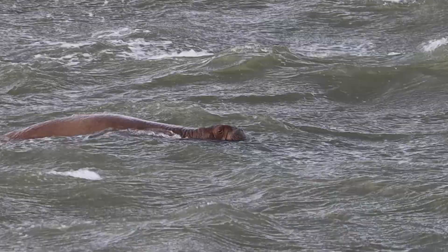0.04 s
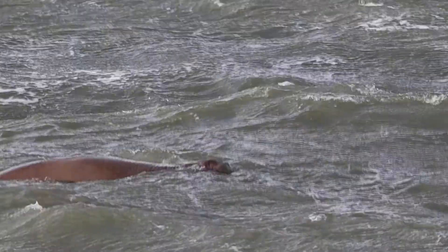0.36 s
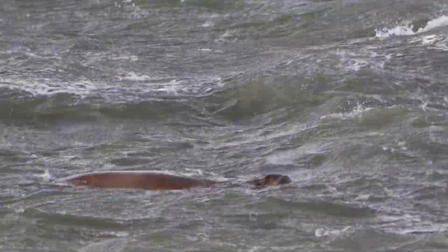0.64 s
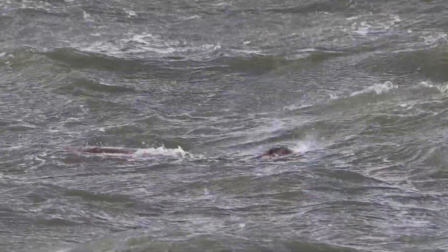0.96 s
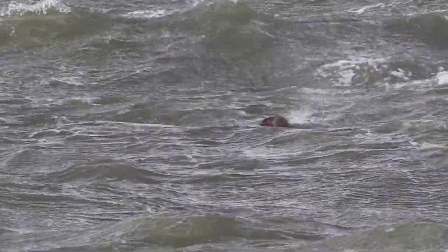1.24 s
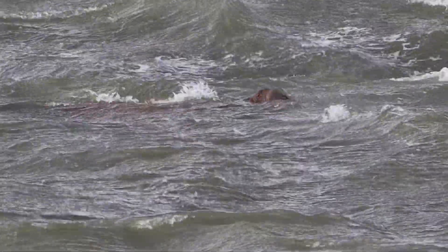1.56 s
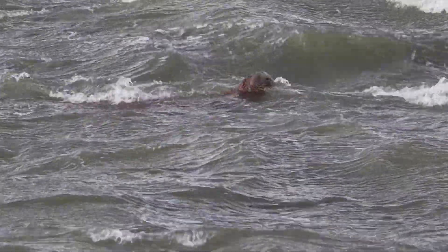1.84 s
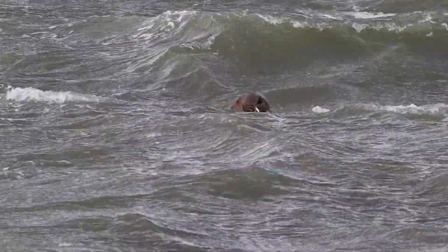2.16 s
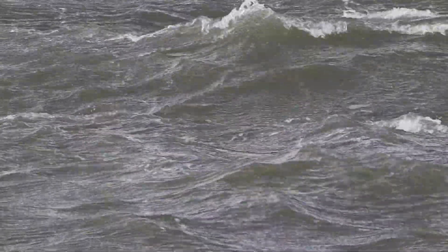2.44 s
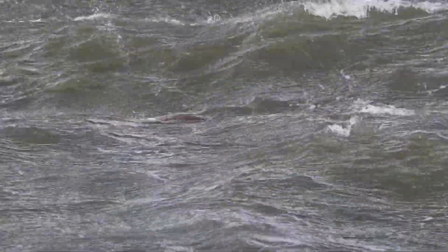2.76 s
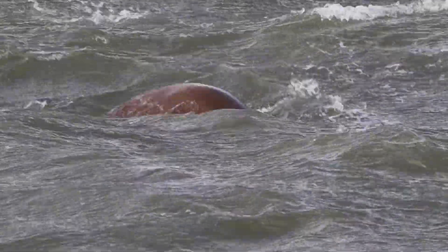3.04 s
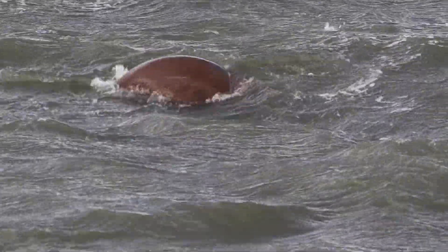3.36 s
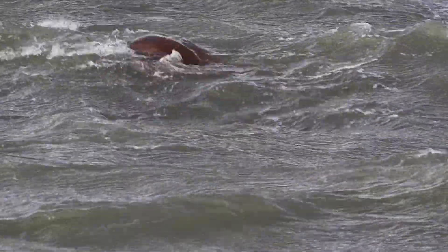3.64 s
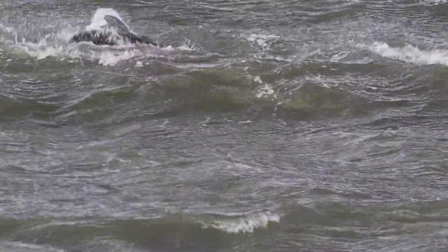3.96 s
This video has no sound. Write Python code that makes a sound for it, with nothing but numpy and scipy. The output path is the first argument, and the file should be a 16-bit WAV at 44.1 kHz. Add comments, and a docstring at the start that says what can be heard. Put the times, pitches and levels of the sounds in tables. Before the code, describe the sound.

Wind buffets the microphone from about 0.1 seconds, fluttering and crackling unevenly on both sides over a thin low rumble. Sharp little snaps cluster in the first half second, and gusts hit around 1 and 1.4 seconds. The wind turns slightly weaker and duller between 2 and 3 seconds, then rushes harder on the right near 3.2 and 3.8 seconds. Choppy sea water hisses faintly underneath throughout.

```python
"""On a shore, gusty wind buffets the two ports of a microphone, whose low cut thins each port's own wind. Small
eddies act locally, so each port has its own turbulence: it flutters, crackles and snaps, and evens into a rush
in the strongest gusts. Large eddies press on both ports together, so the bass is shared. The hiss of choppy
water lies faintly underneath."""
import sys
import numpy as np
from scipy import signal
from scipy.fft import rfft, irfft
from scipy.io import wavfile
from scipy.ndimage import uniform_filter1d

SR = 44100
rng = np.random.default_rng(int(sys.argv[2]) if len(sys.argv) > 2 else 0)


def transcribe(u):
    """Save the signal u as a 16-bit wav file named by the first command-line argument.

    u: samples, shape (n,) or (channels, n), limited to [-1, 1]; the rate is SR.
    q: integer samples, one column per channel.
    """
    v = np.clip(np.atleast_2d(u).T, -1, 1)
    q = np.round(v * 32767).astype(np.int16)
    wavfile.write(sys.argv[1], SR, q)


N = 176400
TIME_S = np.arange(N) / SR
BIN_HZ = np.arange(N // 2 + 1) * SR / N

# Gust envelope at each port: time_s, body_db, treble_db
LEFT_GUSTS = [(.12, -18, -30), (.16, -21, -30.5), (.2, -25.5, -34), (.225, -17, -26), (.28, -24, -36),
              (.38, -16.5, -26.5), (.46, -22, -28), (.54, -19, -37), (.64, -23.5, -34.5),
              (.81, -23.5, -35.5), (.87, -21, -31), (1.07, -23.5, -40), (1.11, -21, -33.5),
              (1.14, -29.5, -45), (1.23, -26.5, -48), (1.32, -22, -33.5), (1.57, -23.5, -34.5),
              (1.66, -29.5, -50), (1.72, -20.5, -31), (1.78, -25.5, -39.5), (1.98, -23, -38.5),
              (2.13, -23, -39.5), (2.19, -25.5, -40.5), (2.27, -20.5, -31.5), (2.41, -29, -51),
              (2.58, -26.5, -46.5), (2.63, -29, -58), (2.87, -27, -51), (2.88, -16.5, -51),
              (2.91, -34, -53), (2.95, -23.5, -33), (3.05, -28, -62), (3.19, -21, -39), (3.24, -30, -50),
              (3.31, -23.5, -44), (3.435, -40, -72), (3.49, -21.5, -56), (3.54, -33, -53),
              (3.61, -26.5, -46), (3.84, -21, -45), (3.86, -26.5, -54), (3.97, -25, -43), (3.99, -31, -50)]
RIGHT_GUSTS = [(0.12, -21.5, -34.5), (0.2, -22.5, -39), (0.3, -21, -43), (0.338, -23, -33),
               (0.348, -12.5, -26), (0.375, -15.5, -24), (0.47, -20.5, -32.5), (0.51, -30, -40),
               (0.53, -20, -28), (0.61, -17.5, -28), (0.63, -35, -48), (0.69, -21.5, -29.5),
               (0.71, -31, -37.5), (0.765, -22.5, -36), (0.795, -27, -36), (0.805, -20, -37),
               (0.83, -16, -22), (0.845, -21, -41), (0.86, -20, -29), (0.9, -26.5, -35), (0.93, -15, -28.5),
               (0.945, -26, -34), (0.982, -28, -45), (0.99, -14, -22.5), (1.01, -26.5, -40),
               (1.07, -28, -40), (1.11, -21, -29), (1.15, -31, -47.5), (1.26, -22.5, -32.5),
               (1.29, -21.5, -43), (1.34, -26, -36), (1.36, -18, -29), (1.408, -21, -38), (1.428, -23, -31),
               (1.438, -13.5, -27.5), (1.448, -9, -27), (1.457, -44, -42), (1.49, -18.5, -36),
               (1.53, -31, -58), (1.58, -18, -26.5), (1.62, -34, -52), (1.705, -27, -43),
               (1.72, -13, -32.5), (1.79, -32, -47), (1.81, -23, -40), (1.94, -28, -47), (1.95, -19, -41),
               (2.0, -18.5, -35.5), (2.02, -22, -44), (2.05, -21, -38), (2.15, -22, -52), (2.18, -31, -42),
               (2.2, -22.5, -39), (2.315, -27.5, -41), (2.325, -16, -34), (2.36, -24.5, -41),
               (2.45, -20.5, -52), (2.49, -17, -33.5), (2.53, -24, -50), (2.59, -19, -39.5),
               (2.64, -28, -51), (2.68, -21, -48), (2.715, -25.5, -49), (2.755, -18.5, -41.5),
               (2.85, -35, -49.5), (2.89, -24, -43), (2.93, -33, -67), (2.97, -17, -37), (3.01, -25.5, -48),
               (3.055, -33.5, -75), (3.065, -22, -56), (3.12, -15, -34.5), (3.16, -15, -26.5),
               (3.21, -16, -30.5), (3.25, -19, -33.5), (3.275, -14, -28), (3.31, -15.5, -24.5),
               (3.32, -17, -35.5), (3.35, -21, -35.5), (3.36, -25, -46), (3.38, -17.5, -31),
               (3.4, -21, -41), (3.42, -33, -65), (3.447, -42, -64), (3.458, -18.5, -38),
               (3.49, -15.5, -36.5), (3.512, -32.5, -59), (3.7, -25, -47), (3.713, -22.5, -56),
               (3.733, -12.5, -40), (3.747, -46, -52), (3.772, -11, -29), (3.785, -31, -60),
               (3.806, -26, -38.5), (3.818, -10.5, -21), (3.835, -19, -35), (3.865, -23.5, -45),
               (3.887, -16, -26), (3.895, -17, -46), (3.91, -36, -54), (3.917, -12.5, -26),
               (3.973, -14.5, -29), (3.99, -29.5, -44)]
# Turbulence spectrum at each port: frequency_hz, density_db
LEFT_SPECTRUM = [(60, -35), (130, -51), (280, -8.5), (600, 2), (800, 2), (1400, -3), (2200, -8.5),
                 (3200, -14), (5000, -27), (7500, -42.5), (10000, -53), (16000, -63)]
RIGHT_SPECTRUM = [(60, -42), (130, -40), (280, -11.5), (600, -0.5), (900, 1.5), (1600, -1), (2200, -6),
                  (3200, -12.5), (5000, -26), (7500, -41.5), (10000, -52.5), (16000, -64)]
def wind_at_ports():
    """Incoherence: small eddies give each port its own noise; only a weak, dull part crosses over."""
    ports = np.array([turbulence(LEFT_GUSTS, LEFT_SPECTRUM) + crackle(LEFT_GUSTS),
                      turbulence(RIGHT_GUSTS, RIGHT_SPECTRUM) + crackle(RIGHT_GUSTS)])
    crosstalk = signal.sosfilt(signal.butter(2, 2380, fs=SR, output="sos"), ports[::-1])
    return ports + undb(-20) * crosstalk


# Eddy scales, large to small: rate_per_s, spread_db
EDDIES = [(70, 2), (220, 4), (700, 3.5)]
# How strongly the eddies modulate each band: frequency_hz, depth_factor
EDDY_DEPTH = [(150, 0.27), (400, 0.81), (900, 1.1), (2500, 1.21), (5000, 1.93), (10000, 2.3)]
# How far each band follows the treble rather than the body: frequency_hz, weight_factor
BRIGHTENING = [(250, -0.1), (900, -0.21), (2000, 0.25), (4500, 0.78), (8000, 1.5), (16000, 1.87)]
def turbulence(gusts, spectrum, usual_treble_db=-20.5, flicker_db=3.5, gain_db=.44):
    """Amplitude modulation: gusts set level and brightness, and eddies shake the treble hardest."""
    body_db = over_time(gusts)
    bright_db = over_time(gusts, column=2) - body_db - usual_treble_db
    broken = intermittency(gusts)
    eddies_db = broken * sum(db * wander(rate) for rate, db in EDDIES)
    air = noise_spectrum(spectrum, unit_band_hz=(300, 2500))
    octaves = np.log2(np.clip(BIN_HZ, 125, 16000))
    rush = 0
    for hz in 125 * 2 ** np.arange(8):
        band = irfft(air * np.maximum(1 - abs(octaves - np.log2(hz)), 0), N)
        shake = flutter(over_hz(EDDY_DEPTH, hz) * eddies_db + flicker_db * broken * wander(47))
        rush += band * shake * undb(body_db + over_hz(BRIGHTENING, hz) * bright_db)
    return rush * undb(gain_db)


# Share of flutter and crackle in the flow: body_db, share_factor
INTERMITTENCY = [(-32.5, 1.0), (-18, 0.76), (-20.5, 0.38)]
def intermittency(gusts):
    """Intermittency: weak flow sputters; above -20.5 dB the share drops abruptly to an evener rush."""
    return np.interp(over_time(gusts), *np.array(INTERMITTENCY).T)


# Spectrum of crackle and snaps: frequency_hz, density_db
BURST_SPECTRUM = [(200, 3), (700, 9.5), (1800, 2.5), (3500, -2.5), (6000, -14), (9000, -25.5), (16000, -41)]
def crackle(gusts, rate_per_s=140, decay_s=.00059, spread_db=8, gain_db=-3):
    """Shot noise: the smallest eddies tick at random against a port, following the gusts' treble."""
    sizes = undb(spread_db * np.minimum(rng.standard_normal(N), 1.76))  # the largest are capped
    strikes = (rng.random(N) < rate_per_s / SR) * sizes
    envelope = signal.lfilter([1], [1, -np.exp(-1 / (decay_s * SR))], strikes)
    bursts = envelope * rng.standard_normal(N)
    ticks = irfft(rfft(bursts) * undb(over_hz(BURST_SPECTRUM, BIN_HZ)), N)
    return ticks / ticks.std() * intermittency(gusts) * undb(over_time(gusts, column=2) + gain_db)


# Sharpest strikes of air: start_s, level_db, left_minus_right_db, tilt_db_per_octave
SNAPS = [(0.162, -2, 17, 2), (0.1694, -6, 16, 2), (0.1906, -3, 15, 2.5), (0.221, -5, 11, 3.5),
         (0.2291, -5, 16, 3.5), (0.2463, -10, 12, 0.5), (0.4531, -12, 8, 6.5), (0.5358, -4.5, -17, 6),
         (.697, -11, -6, 2.5), (0.8675, -10, 15, 3), (.989, -3, -14, 1.5), (1.262, -6, 17, 0),
         (1.3101, -5.5, 5, -3.5), (1.389, -7.5, 10, 3), (1.854, -6.5, 30, 2.5), (1.9763, -6.5, 20, 2),
         (2.085, -9, 21, 1), (2.526, -11.5, 16, 1), (2.5705, -21, -7, 0.5), (2.8807, -4, 10, -10),
         (2.942, -11.5, 1, -2), (3.155, -11, -16, 0), (3.7566, -8.5, 19, 3)]
def snaps(decay_s=.00046, tilt_from_hz=1600, size=1024):
    """Impulse excitation: a small fast eddy strikes a port hard, and so brief a pulse is broadband."""
    out = np.zeros((2, N))
    hz = np.arange(size // 2 + 1) * SR / size
    octaves_up = np.log2(np.maximum(hz / tilt_from_hz, 1))
    envelope = np.exp(-np.arange(size) / SR / decay_s)
    for start_s, level_db, pan_db, tilt_db in SNAPS:
        burst = rfft(rng.standard_normal(size) * envelope) * undb(over_hz(BURST_SPECTRUM, hz))
        burst *= np.linalg.norm(envelope) / np.linalg.norm(irfft(burst))  # equal energy before the tilt
        tick = np.roll(irfft(burst * undb(tilt_db * octaves_up)), size // 2)
        port_gains = undb(level_db + np.minimum([pan_db, -pan_db], 0))
        at = int(start_s * SR) - size // 2
        out[:, at:at + size] += np.outer(port_gains, tick)
    return out


# Pressure spectrum of the large eddies: frequency_hz, density_db
RUMBLE_SPECTRUM = [(25, -28), (50, -37), (90, -17), (160, -6.5), (280, 2.5), (500, 1.5), (900, -15),
                   (2000, -49)]
def rumble(gain_db=-26, gust_share=.6, flutter_db=2.1, lag_s=.0001):
    """Coherence: large eddies press on both ports alike, reaching the right one just before the left."""
    air = irfft(noise_spectrum(RUMBLE_SPECTRUM, unit_band_hz=(80, 300)), N)
    mean_gust_db = (over_time(LEFT_GUSTS) + over_time(RIGHT_GUSTS)) / 2
    air *= undb(gust_share * mean_gust_db + gain_db) * flutter(flutter_db * wander(68))
    return np.array([np.interp(TIME_S - lag_s, TIME_S, air), air])


# Spectrum of the water's hiss: frequency_hz, density_db
SEA_SPECTRUM = [(100, -19), (500, 16.5), (1500, -22), (4000, -23), (8000, -12.5), (16000, -29)]
def sea(level_db=-53.5, swell_db=1.1):
    """Diffuse sound: far-off choppy water gives each port independent hiss with one slow swell."""
    wash = np.array([irfft(noise_spectrum(SEA_SPECTRUM, unit_band_hz=(0, SR)), N) for _ in range(2)])
    return wash * undb(level_db) * flutter(swell_db * wander(3))


def noise_spectrum(shape, unit_band_hz):
    """Spectral shaping: the spectrum of coloured noise with rms 1 inside the given band."""
    low_hz, high_hz = unit_band_hz
    infrasound_cut = BIN_HZ ** 2 / (BIN_HZ ** 2 + 20 ** 2)
    bins = rfft(rng.standard_normal(N)) * undb(over_hz(shape, BIN_HZ)) * infrasound_cut
    return bins / irfft(bins * (BIN_HZ > low_hz) * (BIN_HZ < high_hz), N).std()


def wander(rate):
    """Band-limited noise: a curve of spread 1 that changes about rate times a second."""
    passband = np.exp(-2 * (BIN_HZ / rate) ** 2) * BIN_HZ ** 2 / (BIN_HZ ** 2 + (rate / 7) ** 2)
    curve = irfft(rfft(rng.standard_normal(N)) * passband, N)
    return curve / curve.std()


def flutter(db):
    """Power normalisation: a wavering gain, extremes rounded, with mean power near 1 over 50 ms."""
    limit_db = 2.4 * db.std() + 1e-9
    gain = undb(limit_db * np.tanh(db / limit_db))
    return gain / np.sqrt(uniform_filter1d(gain ** 2, size=2200))


def undb(db):
    """Decibel scale: level to amplitude ratio."""
    return 10 ** (np.asarray(db) / 20)


def over_hz(table, hz):
    """Interpolation of a table along a logarithmic frequency axis."""
    knots_hz, values = np.array(table, float).T
    return np.interp(np.log(np.maximum(hz, 1)), np.log(knots_hz), values)


def over_time(table, column=1):
    """Linear interpolation of one column at every sample."""
    rows = np.array(table, float)
    return np.interp(TIME_S, rows[:, 0], rows[:, column])


def scene(low_cut_hz=222):
    """Superposition: each port's own wind noise, high-passed, adds to the shared rumble and the sea."""
    low_cut = signal.butter(3, low_cut_hz, "high", fs=SR, output="sos")
    return signal.sosfilt(low_cut, wind_at_ports() + snaps()) + rumble() + sea()


def record(dry, opens_s=.1055, top_hz=16100):
    """Gating, clipping and band limiting: the microphone opens in 1 ms, caps peaks and cuts the top."""
    gate = np.clip((TIME_S - opens_s) / .001, 0, 1)
    high_cut = signal.ellip(10, .2, 80, top_hz, fs=SR, output="sos")
    return signal.sosfilt(high_cut, np.clip(dry * gate, -1, 1))


dry = scene()
out = record(dry)
transcribe(out)
```